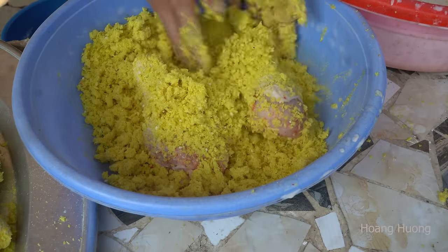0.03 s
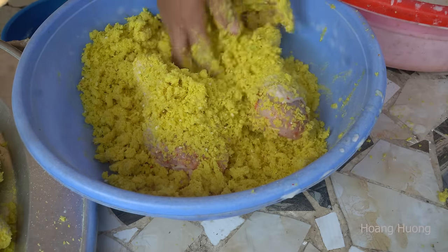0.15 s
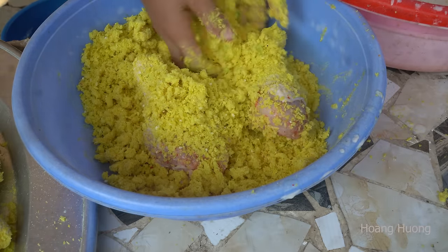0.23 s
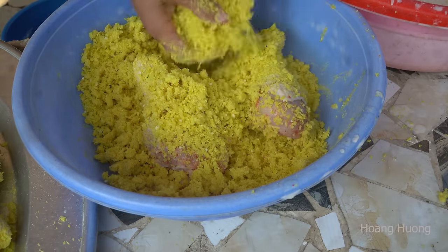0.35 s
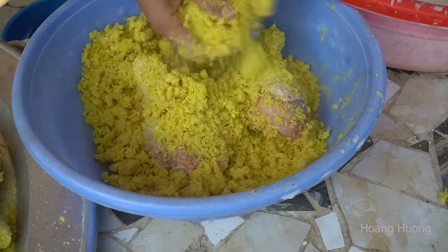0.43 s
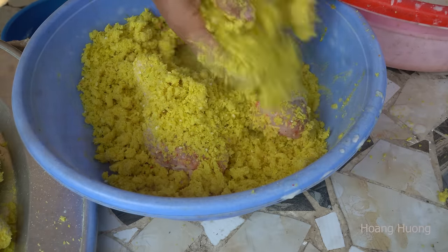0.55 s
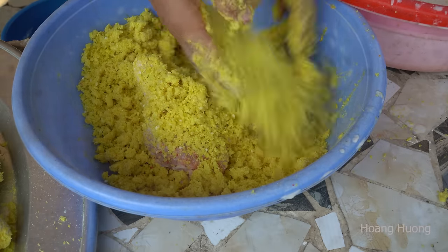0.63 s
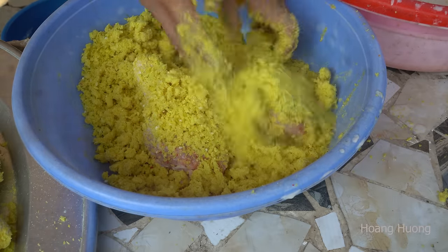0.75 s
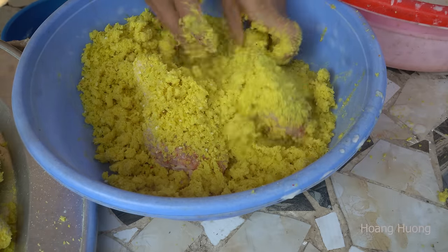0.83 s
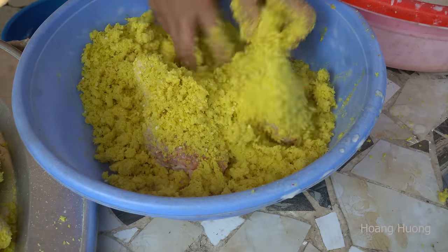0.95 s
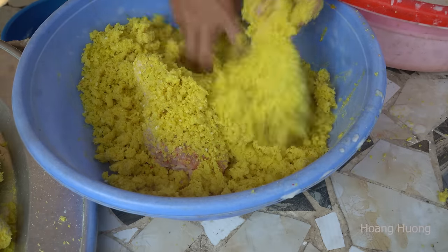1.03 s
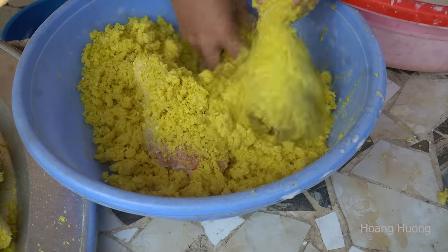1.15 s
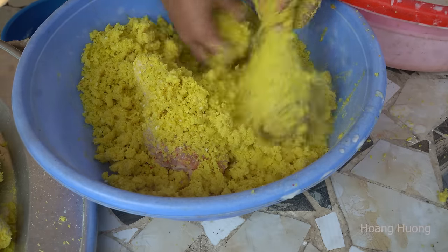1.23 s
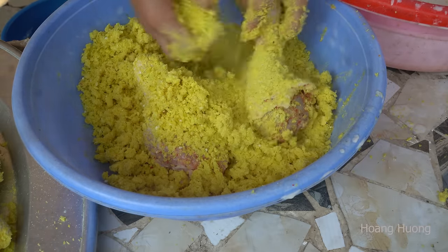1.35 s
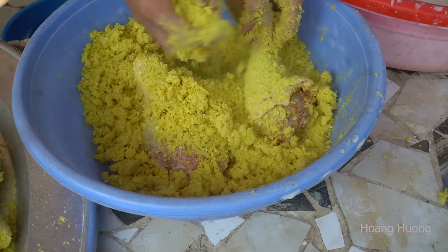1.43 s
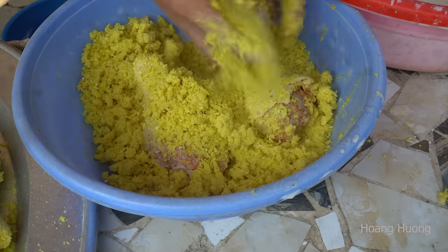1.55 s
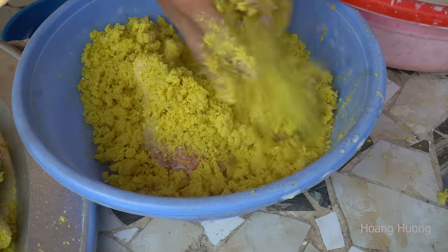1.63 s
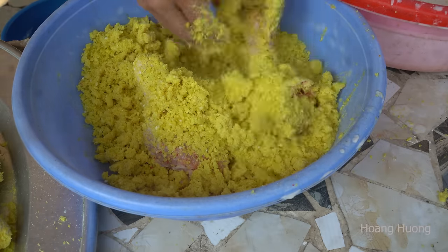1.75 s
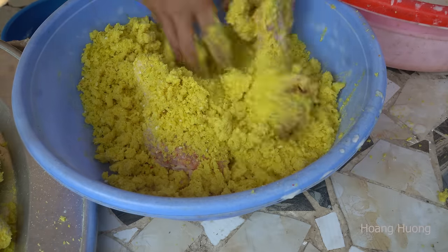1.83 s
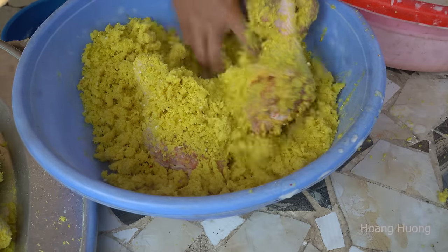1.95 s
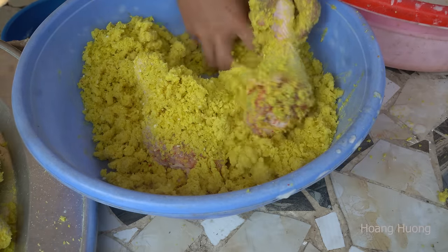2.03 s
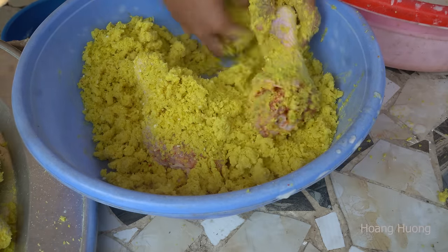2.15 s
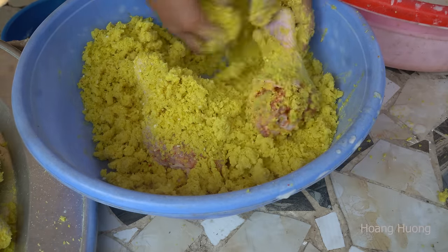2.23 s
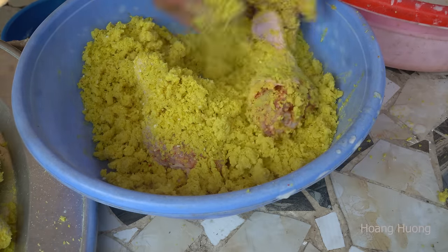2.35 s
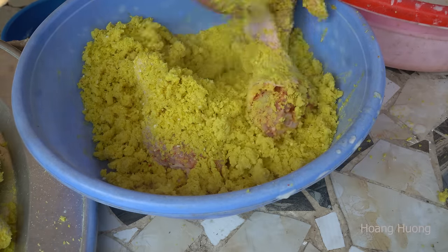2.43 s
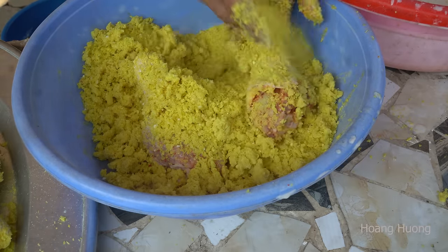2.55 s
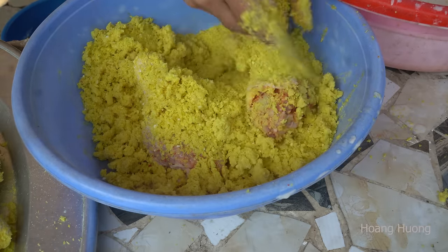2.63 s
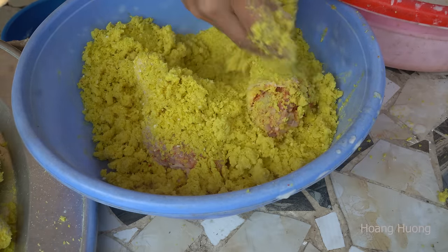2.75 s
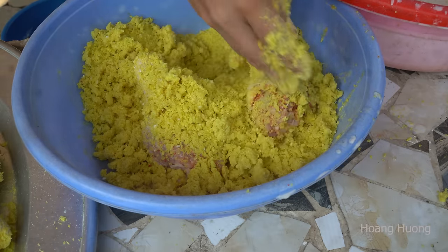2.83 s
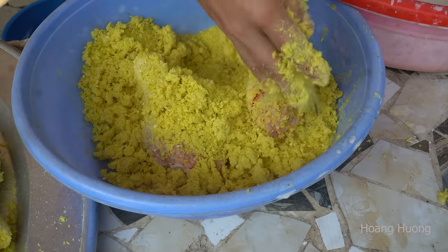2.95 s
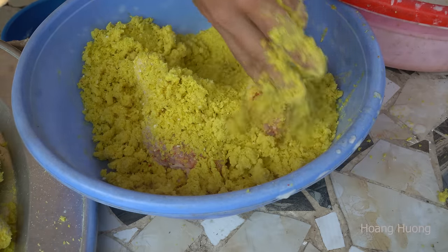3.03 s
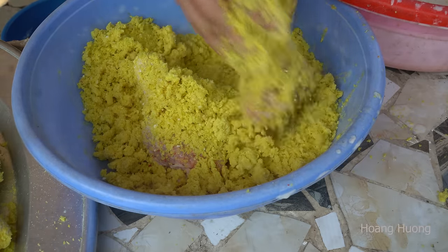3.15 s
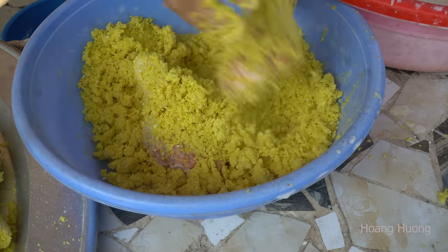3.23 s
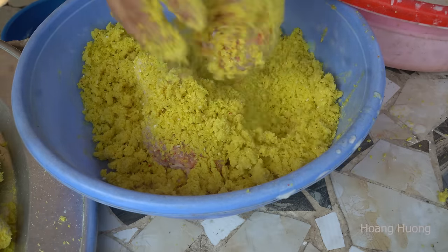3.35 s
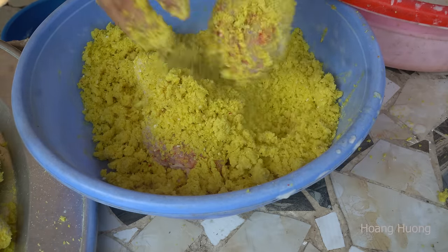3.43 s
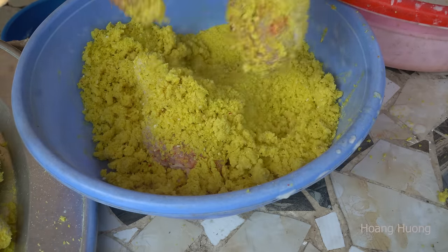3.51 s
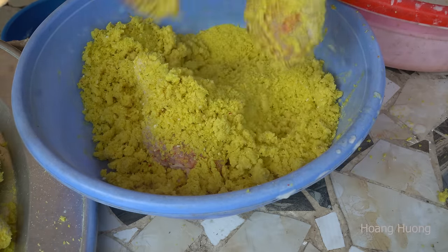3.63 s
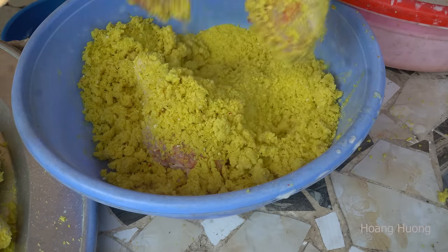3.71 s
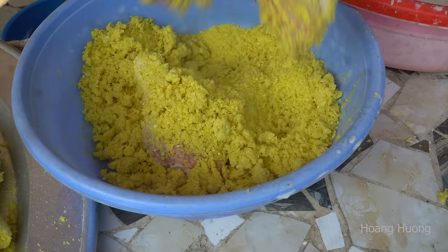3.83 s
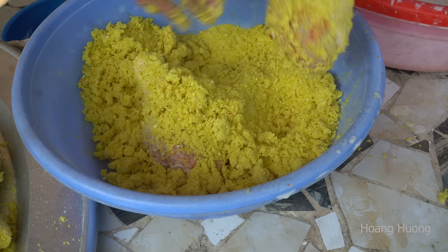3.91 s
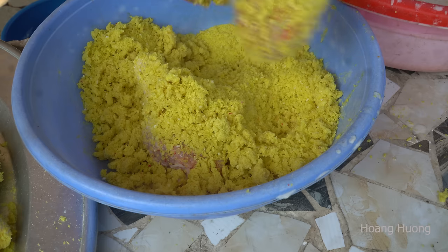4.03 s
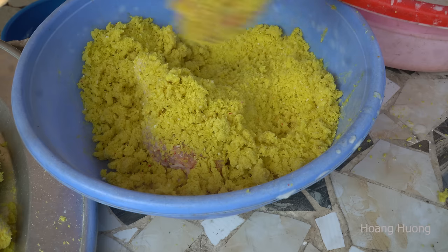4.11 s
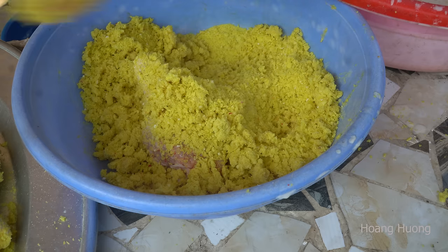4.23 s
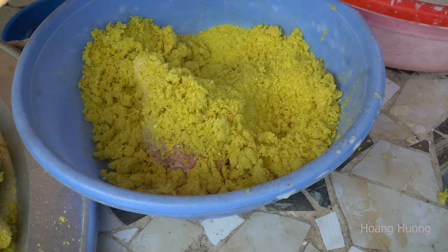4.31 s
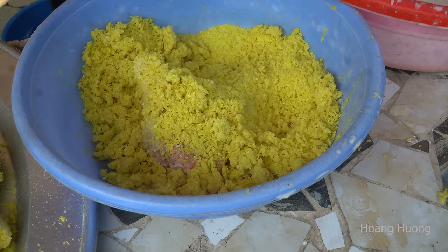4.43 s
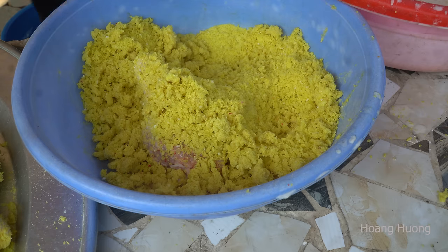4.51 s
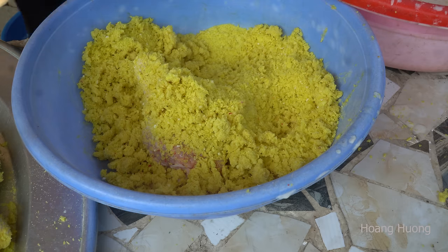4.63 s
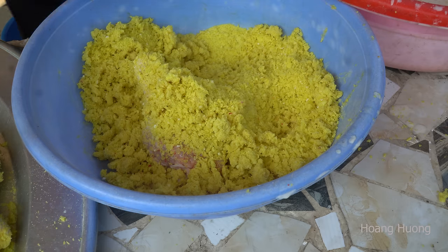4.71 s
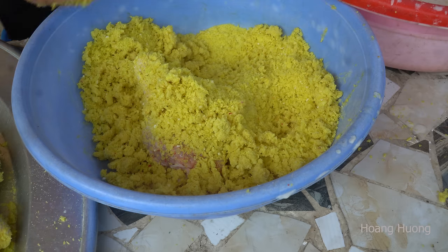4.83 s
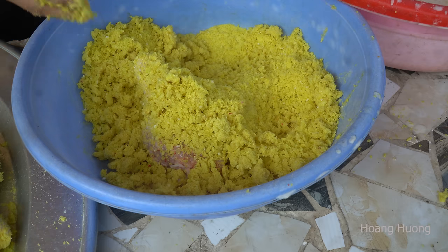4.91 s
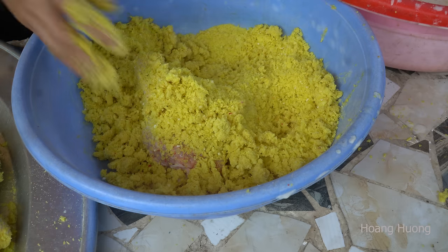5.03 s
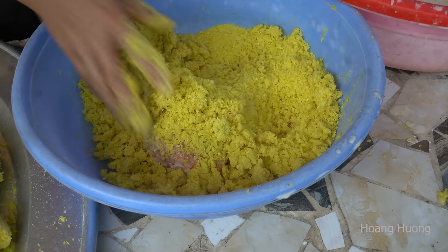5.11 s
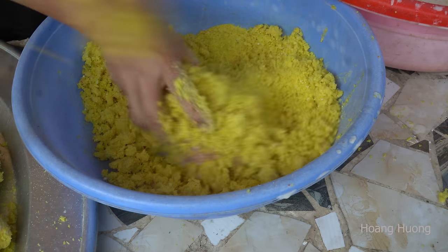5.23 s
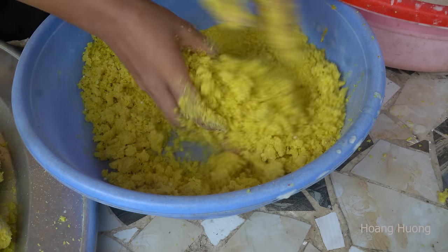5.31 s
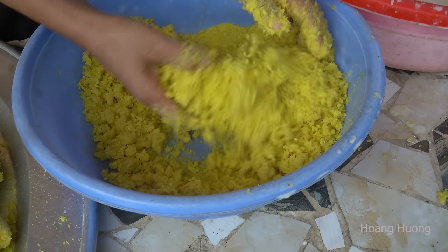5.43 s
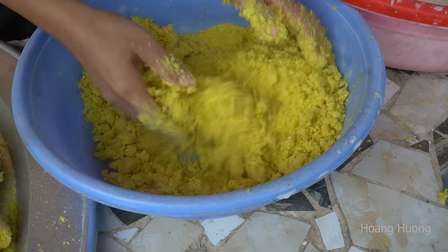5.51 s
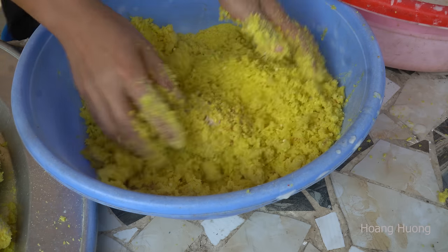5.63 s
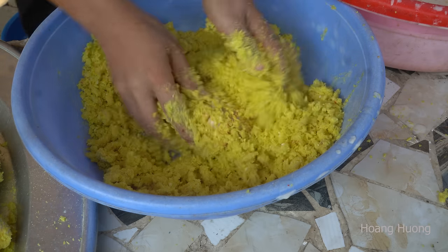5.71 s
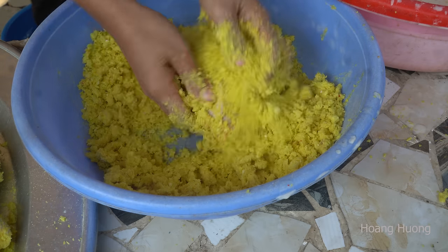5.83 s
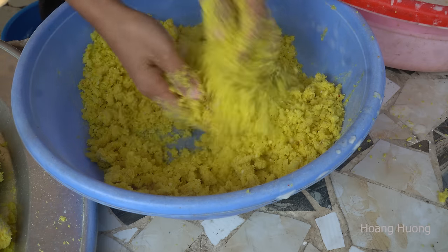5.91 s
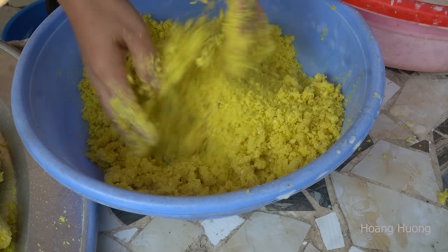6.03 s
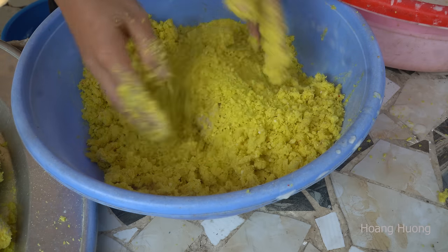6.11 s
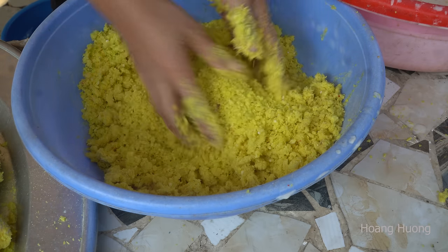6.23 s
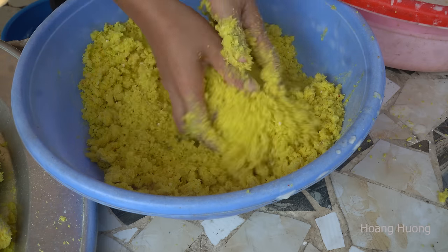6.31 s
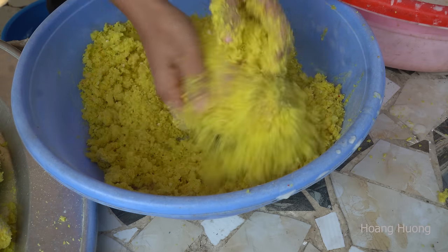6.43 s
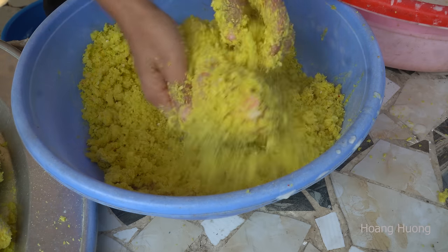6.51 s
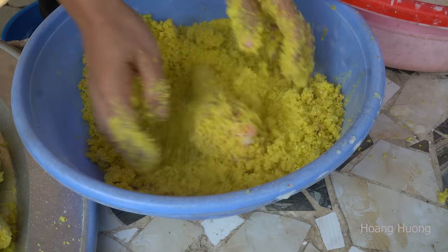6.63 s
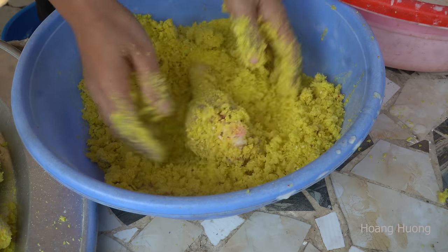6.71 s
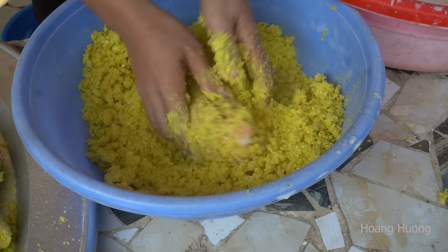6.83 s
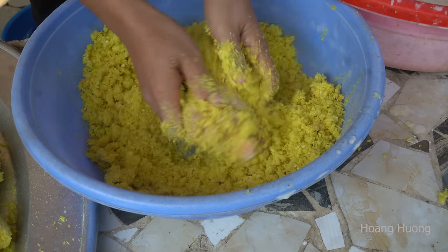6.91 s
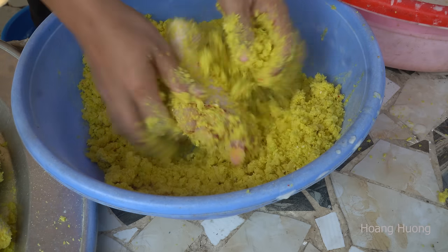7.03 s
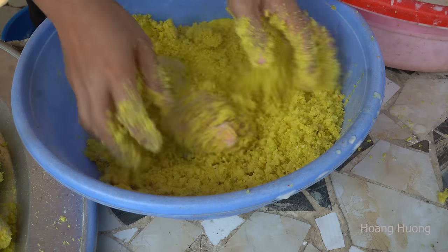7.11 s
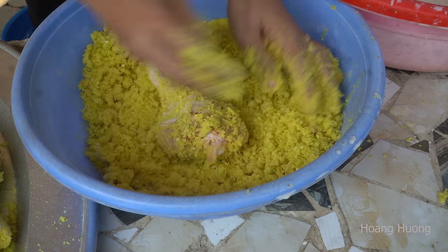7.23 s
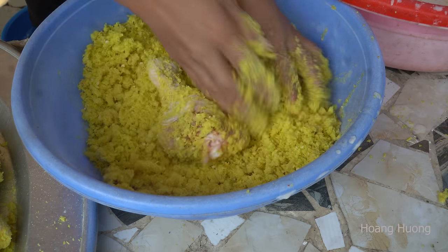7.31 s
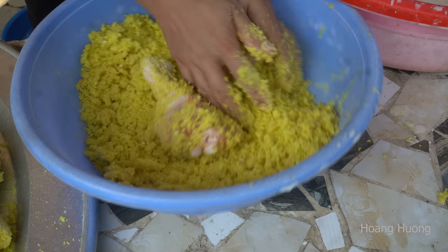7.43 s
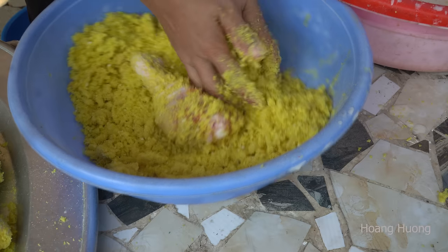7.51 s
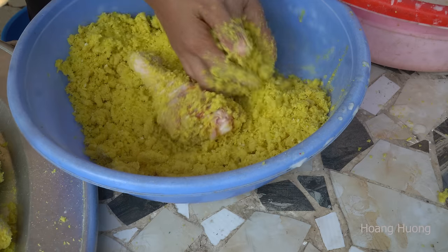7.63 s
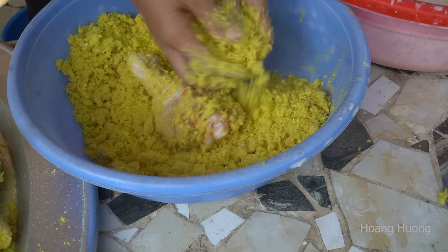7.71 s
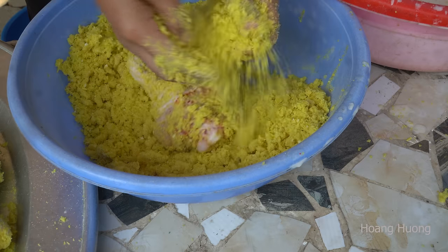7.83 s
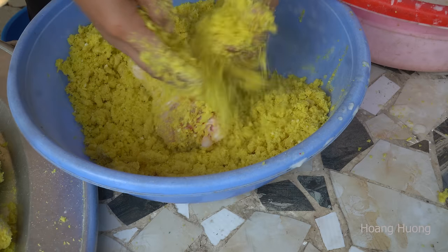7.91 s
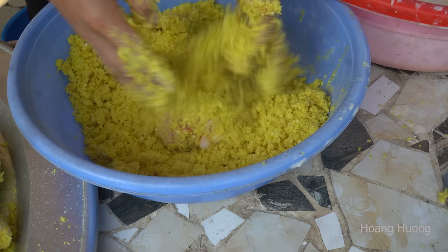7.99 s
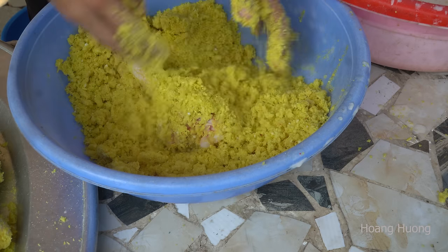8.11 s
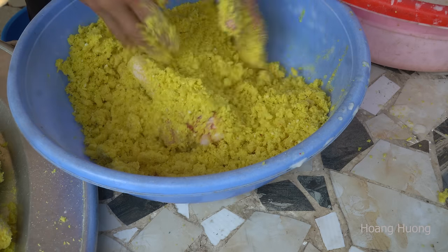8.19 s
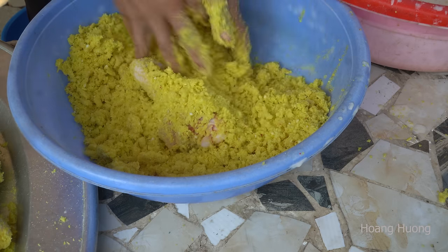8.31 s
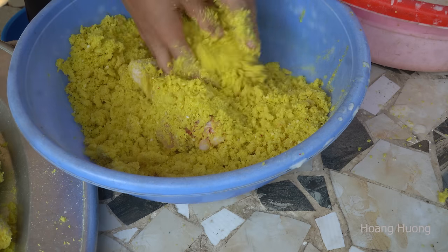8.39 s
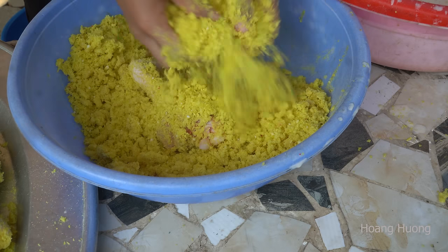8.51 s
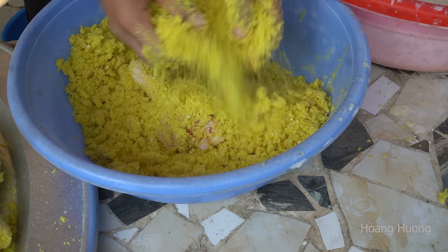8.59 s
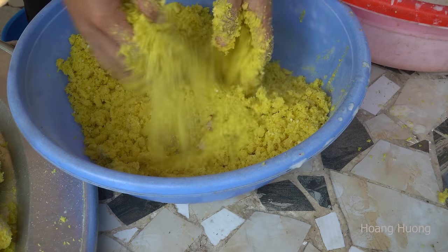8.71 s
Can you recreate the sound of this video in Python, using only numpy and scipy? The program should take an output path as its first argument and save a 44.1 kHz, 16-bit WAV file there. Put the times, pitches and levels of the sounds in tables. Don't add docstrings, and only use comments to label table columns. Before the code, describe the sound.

Hands scoop and toss dry crumbs over chicken legs in a plastic basin, with gritty showers, sharp ticks, hollow wall knocks and light wind rumble.

```python
import sys
import numpy as np
from scipy import signal
from scipy.fft import rfft, irfft
from scipy.io import wavfile
from scipy.ndimage import uniform_filter1d

SR = 44100
rng = np.random.default_rng(int(sys.argv[2]) if len(sys.argv) > 2 else 0)


def materialize(psi):
    bounded = np.clip(np.atleast_2d(psi).T, -1, 1)
    quanta = np.round(bounded * 32767).astype(np.int16)
    wavfile.write(sys.argv[1], SR, quanta)


def volts_from_db(level):
    exponent = np.asarray(level, float) / 20
    return 10 ** exponent


N = 386316
TIME = np.arange(N) / SR
MOMENTS = np.arange(0, N / SR + .002, .001)

# start_s, left_minus_right_db
HAND_PLACE = [(0.0, -2.5), (2.32, -1.5), (3.02, -2.5), (3.44, -1.5), (3.58, -3), (4.17, -6), (4.98, 7),
              (5.22, -0.5), (6.98, -0.5), (7.15, -2.5), (8.61, -1.5), (8.76, -2)]
# pitch_hz, density_db (per Hz)
DUST_COLOUR = [(3240, -55.5), (5500, -6.5), (8450, -1), (12800, -5.5), (15100, -8), (16000, -6)]


def unit(x):
    return x / np.sqrt(np.mean(x ** 2))


def noise():
    return rng.standard_normal(N)


def stereo(likeness):
    middle = np.sqrt((1 + likeness) / 2) * noise()
    side = np.sqrt((1 - likeness) / 2) * noise()
    return middle + side * np.array([[1], [-1]])


def centred(x, likeness):
    middle = x.mean(axis=0)
    return middle + (1 - likeness) * (x - middle)


def sides(pan_db):
    return volts_from_db(np.array([pan_db, -pan_db]) / 2)


def curve(table):
    start_s, level_db = np.transpose(table)
    return np.interp(TIME, start_s, level_db)


def walk(rate):
    hold = int(SR / rate)
    steps = np.repeat(rng.standard_normal(N // hold + 1), hold)
    slewed = uniform_filter1d(uniform_filter1d(steps, hold), hold)[:N]
    return unit(np.tanh(unit(slewed)))


def colour(x, points, size=2048):
    hz, db = np.transpose(points)
    grid = np.maximum(np.arange(size // 2 + 1) * SR / size, 1)
    log_gain = np.interp(np.log(grid), np.log(hz), db) * np.log(10) / 20
    cepstrum = irfft(log_gain)
    cepstrum[1:size // 2] *= 2
    cepstrum[size // 2 + 1:] = 0
    response = irfft(np.exp(rfft(cepstrum)))
    return signal.oaconvolve(x, np.atleast_2d(response), axes=1)[:, :N]


def ring(x, modes, patchy_db=0., rate=12):
    out = 0
    for k, (hz, width, db) in enumerate(modes):
        sway_db = patchy_db * walk(rate) if patchy_db else 0
        mode = signal.lfilter(*signal.iirpeak(hz, hz / width, SR), x)
        out = out + (-1) ** k * volts_from_db(db + sway_db) * mode
    return out


def flow(s, hold, db, swell):
    after = np.maximum(MOMENTS - s - hold, 0)
    fall_s = 0.043 + 0.37 * swell + 0.18 * hold
    settle_s, settle_db = 0.43, -18.5
    rise = volts_from_db(40 * np.minimum(MOMENTS - s, 0) / swell)
    main = volts_from_db(2 * db) * rise * volts_from_db(-40 * after / fall_s)
    stragglers = volts_from_db(2 * (db + settle_db)) * rise * volts_from_db(-40 * after / settle_s)
    return main, stragglers, rise


def total(table):
    return sum(flow(*row)[0] for row in table)


def spread(power):
    return np.interp(TIME, MOMENTS, 10 * np.log10(power + 1e-14))


def yard():
    # pitch_hz, density_db (per Hz)
    hiss_colour = [(88, -27), (150, -8.5), (297, -8), (406, -6), (578, -8.5), (1190, -12.5), (5460, -16),
                   (6390, -25), (11300, -24), (16000, -26)]
    # pitch_hz, width_hz, level_db
    insect_bands = [(4140, 150, -92.5), (5480, 170, -85), (2300, 370, -91)]
    out = unit(colour(stereo(0.13), hiss_colour)) * volts_from_db(-72.5 + 1.1 * walk(5.9))
    for hz, width, db in insect_bands:
        band = unit(ring(stereo(0.13), [(hz, width, 0)]))
        out = out + band * volts_from_db(db + 2.3 * walk(3.6))
    return out


def breeze(crumbs_db):
    # full_s, hold_s, level_db, swell_s
    gusts = [(0.29, .25, -62.5, .1), (0.69, 0.21, -54.5, 0.3), (1.077, 0.27, -53.5, 0.1),
             (1.622, .09, -54, 0.31), (1.9, 0.34, -67, .1), (2.975, 0.22, -64.5, .15),
             (4.427, 0.2, -56.5, 0.23), (4.679, 0.12, -52, 0.13), (4.844, 0.48, -53, .1),
             (5.553, .3, -53, 0.13), (5.95, 0.38, -57, .1), (6.455, 0.074, -52, 0.13),
             (6.735, 0.091, -51.5, 0.16), (6.978, .04, -55.5, .05), (7.2, .05, -70, .06),
             (7.59, .07, -65, .12), (7.83, .02, -64, .06), (8.12, 0.055, -62.5, .06), (8.45, .04, -67, .15)]
    # pitch_hz, density_db (per Hz)
    rumble_colour = [(12, -13.5), (30, 2), (48, -4), (70, -5), (231, -35), (259, -37), (300, -45),
                     (390, -99), (660, -120)]
    # full_s, hold_s, level_db, swell_s
    hums = [
        (0.402, 0.034, -66.5, 0.14),
        (2.724, 0.068, -64.5, 0.33),
        (3.72, 0.053, -69.5, 0.17),
        (4.018, 0.026, -78, .1),
        (4.83, 0.15, -71, 0.069),
        (5.45, 0.11, -67.5, 0.21),
        (7.99, 0.022, -66, 0.3),
    ]
    calm_db, hum_rest_db, hum_share_db = -76.5 + 0.5, -76.5, -30
    gust_db = spread(volts_from_db(2 * calm_db) + total(gusts))
    rumble = unit(colour(stereo(0.95), rumble_colour, size=16384)) * volts_from_db(gust_db + 2.0 * walk(14))
    hollow = [(409, 123, 0)]
    driven = volts_from_db(2 * (crumbs_db + hum_share_db))
    hum_power = volts_from_db(2 * hum_rest_db) + driven + volts_from_db(2 * spread(total(hums)))
    hum = unit(ring(ring(stereo(0.89), hollow), hollow)) * np.sqrt(hum_power) * volts_from_db(1.15 * walk(18))
    return rumble + hum


def thuds():
    # start_s, peak_db, pitch_hz, t60_s
    knocks_and_rings = [(1.955, -53.5, 120, 0.23), (4.971, -42, 139.6, 0.12), (6.684, -53.5, 171, 0.13),
                        (7.569, -48.5, 203, 0.1), (8.361, -61, 132, 0.081), (7.105, -54.5, 820, 0.043),
                        (3.872, -67, 2550, .15), (8.722, -60, 2540, 0.18), (5.82, -39, 1630, .08),
                        (7.484, -34.0, 570, 0.07), (7.514, -35.0, 530, 0.054)]
    t = np.arange(int(.3 * SR)) / SR
    out = np.zeros(N + len(t))
    for s, db, hz, t60 in knocks_and_rings:
        phase = 2 * np.pi * (hz * t + 0.21 * (1 - np.exp(-t / 0.018)))
        envelope = (1 - np.exp(-t / 0.00057)) * 1000. ** (-t / t60)
        i = int(s * SR)
        out[i:i + len(t)] += volts_from_db(db + 3.5) * np.sin(phase) * envelope
    return out[:N]


def echo(x, t60, db):
    t = np.arange(int(.25 * SR)) / SR
    tail = rng.standard_normal((2, len(t))) * 1000. ** (-t / t60) * (t > .002)
    tail = tail - 0.52 * signal.lfilter([.15], [1, -.85], tail - tail.mean(axis=0))
    tail = tail / np.sqrt(np.sum(tail[0] ** 2))
    return x + volts_from_db(db) * signal.oaconvolve(x, tail, axes=1)[:, :N]


def grains(rate, scatter_db, spread_db, lag_s, hiss_db):
    at = np.nonzero(rng.random(N - 64) < rate / SR)[0] + 32
    size_db = scatter_db * np.minimum(rng.exponential(size=len(at)), 5)
    size = volts_from_db(size_db) * rng.choice([-1, 1], len(at))
    place = rng.standard_normal(len(at))
    lag = np.clip(np.round(place * lag_s * SR), -30, 30).astype(int)
    out = np.zeros((2, N))
    out[0, at] = size * volts_from_db(spread_db * place / 2)
    np.add.at(out[1], at + lag, size * volts_from_db(-spread_db * place / 2))
    return unit(out) + volts_from_db(hiss_db) * stereo(0.66)


def trickle():
    # start_s, rattle_db
    drip = [
        (2.45, -71),
        (2.6, -64.5),
        (2.8, -70),
        (3.07, -76),
        (3.18, -71),
        (3.58, -71.5),
        (3.81, -68.5),
        (4.05, -70),
        (4.2, -76),
        (4.4, -87),
    ]
    # pitch_hz, width_hz, level_db
    bare_modes = [(1670, 500, -9), (2100, 100, -1.5), (2550, 110, -3.5), (3300, 490, -7.5), (4100, 330, -4)]
    db = curve(drip)
    on = (TIME > drip[0][0]) & (TIME < 4.78)
    hits = grains(rate=400, scatter_db=2.6, spread_db=2.5, lag_s=.00005, hiss_db=-1.5)
    rung = ring(ring(hits, bare_modes, patchy_db=3.0, rate=16), [(2800, 3500, 0)])
    bare = unit(rung) * volts_from_db(db - 3)
    dust = unit(colour(hits, DUST_COLOUR)) * volts_from_db(db - 4.5)
    return on * sides(-4.0)[:, None] * (bare + dust)


def ticks():
    # start_s, peak_db, ring_hz, bright_edge_db
    lumps = [(0.7013, -47, 2060, 5), (0.9892, -37, 1840, -26), (1.1816, -36, 2150, -38),
             (1.9437, -23, 2480, -38), (1.9497, -23, 2300, -37), (1.9734, -21, 2180, -38),
             (2.0678, -23.5, 2500, -45), (4.7873, -39, 2860, -10.5), (4.9719, -39, 1730, -42),
             (5.2125, -40, 1840, -28), (6.1268, -30, 1670, -15), (6.5328, -31.5, 1820, -7.5),
             (6.615, -30, 1820, -12), (6.6839, -32, 2230, -37), (6.8234, -27, 2390, -40),
             (6.9736, -37, 1700, -11), (7.1597, -38.5, 2230, -9), (7.4855, -21.5, 2580, -29)]
    # start_s, peak_db, ring_hz, bright_edge_db
    lone_crumbs = [(0.4176, -33, 3180, -77), (0.6787, -38, 3170, -21), (0.7196, -27, 2260, -14),
                   (0.7374, -24, 3300, -15), (1.7063, -36, 2080, -6), (1.7117, -29, 2040, -34),
                   (1.7902, -29, 1910, -6.5), (1.809, -30, 2170, -12), (2.4229, -35.5, 2120, -28),
                   (4.887, -54.5, 4470, -6), (4.915, -56, 4330, -5), (5.0967, -45, 4100, -6),
                   (5.1263, -39, 1804, -14), (0.5786, -52, 3880, -4), (4.066, -60, 4000, 2),
                   (4.08, -61, 4000, 2), (5.567, -19, 2300, -49), (5.8234, -19, 1630, -43),
                   (6.081, -31.5, 1740, -13), (7.1945, -27, 3400, -23), (7.9339, -42, 3080, -7),
                   (8.0884, -53, 2100, -10), (8.1052, -39, 3340, -4), (8.1606, -29.5, 3860, -19),
                   (8.215, -35, 3860, -3), (8.2417, -29, 1890, -30), (8.585, -38.5, 3870, -2),
                   (8.6658, -39.5, 2430, -8), (8.6765, -36.5, 3300, -7.5), (8.7113, -36.5, 2970, -22),
                   (8.739, -40, 2550, -13)]
    # start_s, peak_db, ring_hz, bright_edge_db
    drops = [(1.735, -40, 1910, -30), (1.7574, -40, 2050, -14), (1.828, -39, 2150, -26),
             (1.864, -43, 2130, -26), (2.6241, -35, 2280, -13), (2.655, -40.5, 2180, -11),
             (2.687, -40.5, 2230, -10.5), (3.0076, -41.5, 2040, -45), (3.018, -38, 1870, -47),
             (3.0813, -53, 1810, -2), (3.0984, -49, 2250, -10), (3.1332, -45, 2200, -8),
             (3.155, -46, 2020, -6), (3.2836, -48, 2050, -16), (3.4065, -59.5, 3740, 3),
             (3.4441, -52, 6460, -6), (3.6588, -34, 2500, -17), (3.6833, -44.5, 1670, -9),
             (3.6934, -53, 1960, -12), (3.7187, -46, 2110, -7), (3.7315, -45, 2090, -5),
             (3.7754, -49, 2250, -20), (3.795, -51, 2170, -10), (3.8054, -49, 2250, -7),
             (3.869, -53, 2530, -5), (3.925, -54, 2480, -16), (4.0563, -47, 2260, -16),
             (4.1145, -46, 2220, -15), (4.152, -48, 2180, -27)]
    # start_s, peak_db, ring_hz, bright_edge_db
    flecks = [(0.3406, -46, 3300, -8), (0.358, -51, 4000, 0), (0.3661, -46, 3110, -8),
              (0.443, -45, 4000, -8), (0.483, -47, 3000, -12), (0.49, -42.5, 3970, -13),
              (0.5117, -46, 2020, -13.5), (0.6035, -47.5, 3850, -14), (1.6796, -60, 2300, 4),
              (2.192, -41, 4500, 6), (2.246, -40, 2400, -20), (3.1072, -58, 4000, 5),
              (3.148, -54, 3000, -6), (3.222, -61, 4000, 4), (3.2763, -60, 4000, 2), (3.3078, -62, 4500, 7),
              (3.3626, -64, 4680, 2), (3.3686, -59, 4270, 0), (3.4275, -59, 5970, 4),
              (3.5726, -60, 3860, 4), (3.6335, -60, 3880, 2), (3.9064, -57, 2520, -4),
              (3.9413, -61, 2550, -2), (4.7817, -45.5, 4100, -3.5), (5.0408, -50.5, 3100, -5),
              (5.894, -41, 4500, 6), (5.908, -43, 4500, 3), (6.5104, -43, 4140, -10),
              (6.5947, -36, 3300, -14), (6.636, -35, 4500, -8), (7.212, -41, 2500, -10),
              (7.251, -33.5, 2000, -12), (7.6902, -43, 1810, -19), (7.808, -43.5, 2740, -7),
              (8.151, -33, 2600, -20), (8.164, -35, 3900, -7), (8.199, -45, 2060, -4),
              (8.5316, -42, 3910, -10), (8.639, -51, 2580, -11)]
    # start_s, peak_db, ring_hz, bright_edge_db
    more_lumps = [(1.0036, -34, 2470, -25), (1.988, -29, 2200, -25), (2.034, -25, 2500, -25),
                  (2.0892, -31, 2870, -20), (2.129, -29.5, 2600, -20), (2.173, -40, 3000, -18),
                  (2.224, -34.5, 1600, -25), (5.2816, -31, 2360, -22), (5.5376, -34, 2230, -18),
                  (6.242, -43, 1640, -23), (6.2819, -29, 2520, -22), (7.4815, -28, 3000, -25),
                  (7.582, -28, 2200, -25), (8.3716, -29, 1950, -22)]
    kinds = (lumps, -15.5), (lone_crumbs, -34), (drops, -30), (flecks, -30), (more_lumps, -15.5)
    events = [(*row, wall_db) for rows, wall_db in kinds for row in rows]
    pan_db = 2.63 * curve(HAND_PLACE)
    t = np.arange(int(0.029 * SR)) / SR
    bright = signal.butter(2, (4500, 12500), "band", fs=SR)
    small = signal.butter(4, (1500, 6040), "band", fs=SR)
    out = np.zeros((2, N + len(t)))
    for s, db, hz, edge_db, wall_db in events:
        bounce_chance, wall_chance = rng.random(2)
        grit = rng.standard_normal((3, len(t)))
        near = grit[2] + .5 * grit[:2]
        click = t == 0
        late = np.maximum(t - .0015 - 0.00095 * bounce_chance, 0)
        note = .7 * np.sin(2 * np.pi * hz * t) * np.exp(-t / .0008)
        bounce = 0.3 * np.sin(2 * np.pi * hz * late) * np.exp(-late / 0.0016)
        snap = ring(.6 * near + 8 * click, [(3600, 4000, -1)]) * np.exp(-t / .0009)
        rattle_db = 2 - .45 * max(db + 39, 0)
        rattle = ring(near, [(hz, 220, -1), (4100, 450, -5)]) * np.exp(-t / 0.0089) * volts_from_db(rattle_db)
        edge = signal.lfilter(*bright, near) * np.exp(-t / .0014) * volts_from_db(edge_db + 5.5)
        wall = ring(0.6 * grit[2] + 5.4 * click, [(600 + 400 * wall_chance, 600, 0)])
        wall = wall * np.exp(-t / 0.0077) * volts_from_db(wall_db + 17.0)
        body = signal.lfilter(*small, note + bounce + snap + rattle)
        i = int(s * SR)
        out[:, i:i + len(t)] += volts_from_db(db - 3.0) * sides(pan_db[i])[:, None] * (body + edge + wall)
    return out[:, :N]


def handfuls():
    # full_s, hold_s, rattle_db, swell_s, wall_share_db
    first_leg = [(0.03, 0.047, -45.5, 0.21, -9), (0.133, 0.071, -39, 0.087, -3),
                 (0.237, 0.037, -41.5, .04, -7.5), (0.386, 0.019, -51, 0.18, -12.5),
                 (0.727, .003, -43.5, 0.043, -14), (0.78, 0.08, -54.5, 0.073, -5),
                 (1.005, 0.11, -40.5, 0.045, -6), (1.088, 0.12, -43, 0.041, -8),
                 (1.291, 0.091, -53.5, 0.05, -8.5), (1.72, .03, -67, 0.069, -1),
                 (1.81, 0.017, -60, 0.24, -6.5), (1.938, 0.1, -43, 0.034, -4),
                 (2.099, 0.074, -41, 0.17, -10), (2.268, 0.13, -55.5, .1, -10),
                 (2.378, 0.013, -53.5, 0.078, -20), (2.46, 0.035, -66, .1, -1.5),
                 (1.505, 0.053, -72, 0.028, 3.5)]
    # full_s, hold_s, rattle_db, swell_s, wall_share_db
    second_leg = [(4.786, 0.039, -63.5, 0.01, -1.5), (4.978, 0.082, -67, 0.12, -8),
                  (5.304, 0.053, -36.5, 0.069, -12.5), (5.413, 0.037, -50.5, 0.46, -1.5),
                  (5.555, 0.093, -43, 0.087, -6), (5.744, 0.11, -37.5, 0.26, -9),
                  (5.999, 0.044, -48.5, 0.065, -5), (6.083, .003, -45, 0.03, -6.5),
                  (6.123, 0.0027, -46.5, 0.0075, -0.5), (6.247, 0.022, -52.5, 0.023, -4),
                  (6.291, 0.062, -41, 0.08, -8.5), (6.54, 0.15, -52, 0.22, -10),
                  (6.62, .003, -44.5, 0.018, -4), (6.683, 0.0034, -45.5, 0.02, -1),
                  (6.828, .04, -40.5, 0.039, -6), (6.879, 0.052, -48, 0.035, -4),
                  (7.167, .06, -50.5, 0.034, -7.5), (7.293, .04, -54, 0.099, -7),
                  (7.419, 0.05, -39.5, 0.13, -13), (7.484, 0.11, -37, 0.057, -6.5),
                  (7.764, 0.23, -63.5, 0.07, -10.5), (8.093, 0.023, -59, 0.037, -19.5),
                  (8.157, 0.0024, -55, 0.014, -28), (8.232, 0.053, -43.5, 0.037, -18),
                  (8.375, 0.044, -37, 0.16, -8), (8.494, .03, -58.5, 0.13, -18),
                  (8.75, .02, -60, 0.29, -8.5)]
    # full_s, hold_s, level_db, swell_s
    sifts = [(0.0, 0.043, -54.5, 0.091), (0.717, 0.073, -52, 0.093), (1.7, 0.016, -57.5, 0.23),
             (2.117, 0.065, -48, 0.03), (5, 0.056, -64.5, .1), (5.5, 0.035, -51.5, .015),
             (2, 0.059, -66, 0.092), (1.02, 0.085, -55, 0.035), (1.95, .08, -54, .03), (5, .05, -50, 0.054),
             (5.72, .1, -58, 0.2), (6.55, .14, -58, .03), (7.5, 0.066, -51, .05), (8.22, 0.11, -56.5, .02),
             (8.38, 0.047, -50, 0.11), (6.42, 0.054, -60, 0.061), (7.0, 0.13, -64.5, .05),
             (8, .1, -63.5, .05), (6, 0.094, -60.5, .1), (3, 0.4, -76, .1), (0.9, .07, -59, .05),
             (1.35, 0.064, -59, .03), (8, 0.086, -62, .05), (0.5, .1, -67, .05),
             (7.177, 0.098, -59.5, 0.01), (7.408, 0.056, -47, 0.049), (7.5, 0.36, -60, 0.3),
             (8.5, 0.23, -59, 0.43)]
    # full_s, hold_s, level_db, swell_s
    grazes = [(0.017, .05, -46, .05), (0.156, 0.11, -46.5, 0.067), (0.387, .05, -59, .05),
              (0.49, .1, -65, .02), (0.709, .15, -53.5, 0.044), (1.3, 0.063, -59, .05),
              (1.025, 0.11, -49, .04), (1.963, .08, -49.5, .03), (2.124, 0.045, -49.5, 0.045),
              (6.25, 0.074, -61, .02), (6.514, 0.062, -59.5, .02), (7.192, .05, -62, .03),
              (7.4, 0.058, -43, 0.095), (8.214, 0.055, -50, .02), (8.517, 0.031, -65, 0.044)]
    power = wall = early = 0
    for *shape, wall_db in first_leg + second_leg:
        main, rest, rise = flow(*shape)
        power = power + main + rest
        early = early + main * (1 - rise)
        wall = wall + (main * rise ** 0.096 + rest * volts_from_db(2 * -8)) * volts_from_db(2 * wall_db)
    db = spread(power)
    above_usual_db = np.maximum(db, -70) + 45
    sift = volts_from_db(2 * (spread(total(sifts)) - db))
    dust = volts_from_db(2 * (-10.5 - 0.4 * above_usual_db)) + sift
    early_share = volts_from_db(2 * (spread(early) - db))
    rim_db = -5.5 + 2 * sift / dust - 0.5 * early_share
    graze = volts_from_db(2 * (spread(total(grazes)) - db))
    rim_db = 10 * np.log10(volts_from_db(2 * rim_db) + graze)
    return db, spread(wall) - db, 10 * np.log10(dust), rim_db


def shower(db, wall_db, dust_db, rim_db):
    # pitch_hz, width_hz, level_db
    bowl_modes = [(1695, 348, -1.5), (2080, 364, -0.5), (2640, 460, -1.5)]
    # pitch_hz, width_hz, level_db
    rim_modes = [(3020, 640, -2), (4030, 440, 1), (4370, 1130, -4)]
    # pitch_hz, width_hz, level_db
    wall_modes = [(566.6, 105, 2.5), (694, 200, 1), (881, 127, 2.5), (1180, 168, -1.5)]
    # pitch_hz, width_hz, level_db
    base_modes = [(126.6, 15, 4.5), (223, 160, -8)]
    clumps = volts_from_db(1.3 * walk(70))
    hits = grains(rate=2200, scatter_db=3.0, spread_db=1.5, lag_s=.00005, hiss_db=-1.0) * clumps
    fine = hits + unit(stereo(0.5)) * clumps * volts_from_db(np.clip(.4 * (db + 58), -8, 6))

    bowl = ring(centred(hits, 0.2), bowl_modes, patchy_db=1.6, rate=37)
    bowl = unit(ring(bowl, [(2100, 5900, 0)]))
    bowl = bowl * np.sqrt(np.clip(1 - volts_from_db(2 * rim_db), .1, 1))
    rim = ring(hits, rim_modes, patchy_db=1.1, rate=37)
    rim = unit(ring(rim, [(4170, 3950, 0)])) * volts_from_db(rim_db + 1.33)
    wall = ring(centred(hits, 0.59), wall_modes, patchy_db=2.0, rate=30)
    wall = unit(ring(wall, [(680, 3000, 0)])) * volts_from_db(wall_db + 1.17)
    base = ring(centred(hits, 0.52), base_modes)
    base = unit(ring(base, [(157, 320, 0)])) * volts_from_db(wall_db - 19.5 + 1.5 * walk(12))
    dust = unit(colour(fine, DUST_COLOUR)) * volts_from_db(dust_db + 1.0)
    return volts_from_db(db - 1.42) * (sides(curve(HAND_PLACE)) * (bowl + rim + dust) + wall + base)


def scene():
    crumbs = handfuls()
    in_basin = shower(*crumbs) + trickle() + ticks()
    return echo(in_basin, t60=.18, db=-12.0) + thuds() + breeze(crumbs[0]) + yard()


def band_limit(x):
    return signal.sosfilt(signal.butter(12, 17000, fs=SR, output="sos"), x)


def low_pass(x, top_hz):
    return signal.sosfiltfilt(signal.ellip(8, .1, 50, top_hz, fs=SR, output="sos"), x)


def record(dry):
    wide = low_pass(dry, 15850)
    narrow = low_pass(dry, 11900)
    quiet = uniform_filter1d(1. * (TIME > 4.21) * (TIME < 4.765), size=600)
    mix = wide + quiet * (narrow - wide)
    return band_limit(mix)


dry = scene()
out = record(dry)
materialize(out)
```